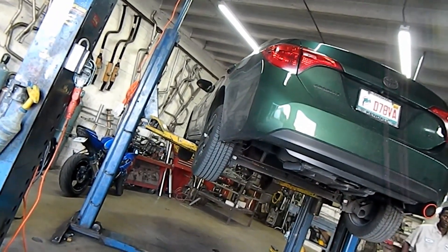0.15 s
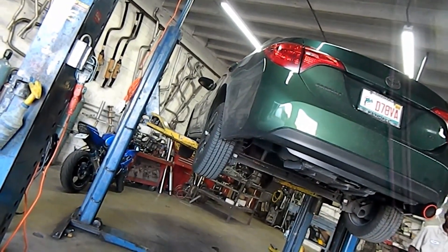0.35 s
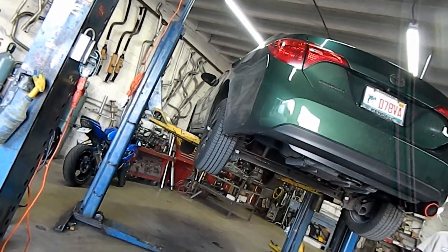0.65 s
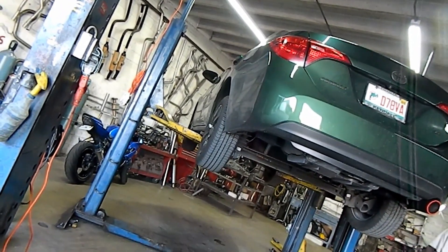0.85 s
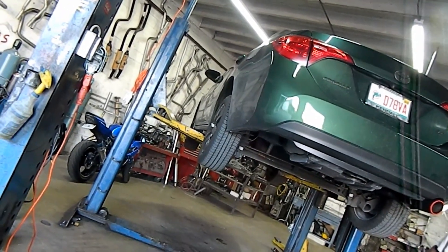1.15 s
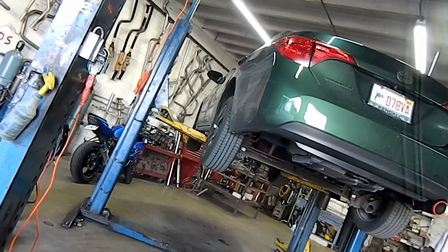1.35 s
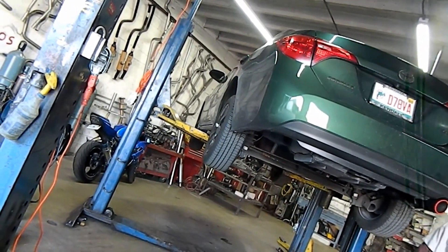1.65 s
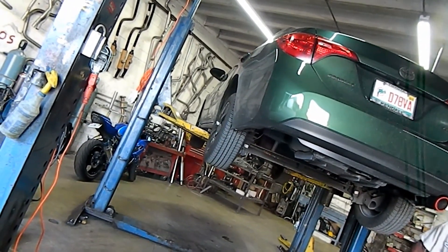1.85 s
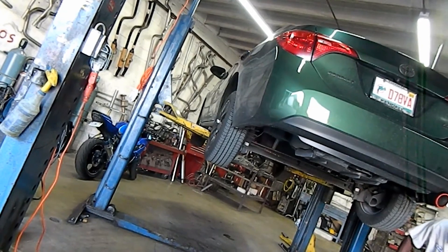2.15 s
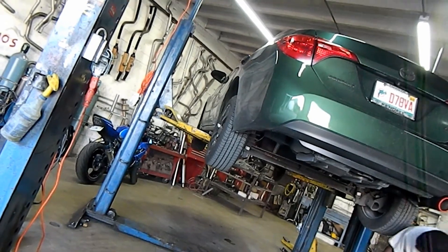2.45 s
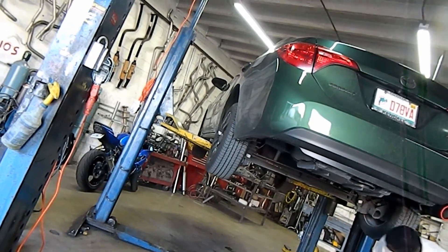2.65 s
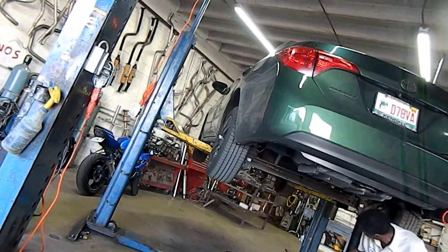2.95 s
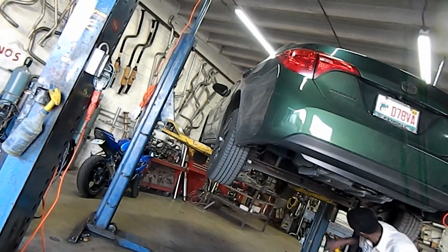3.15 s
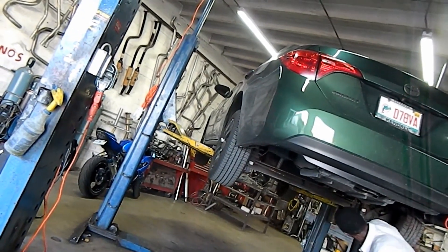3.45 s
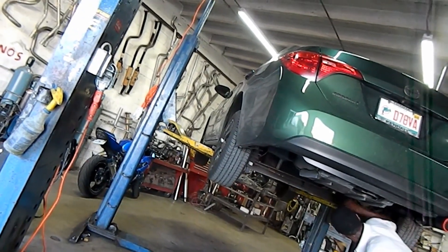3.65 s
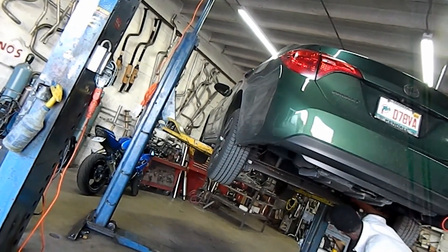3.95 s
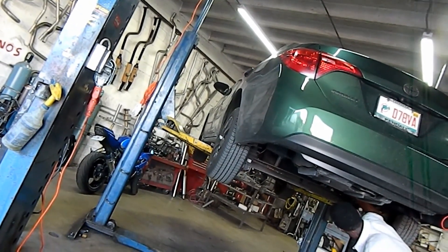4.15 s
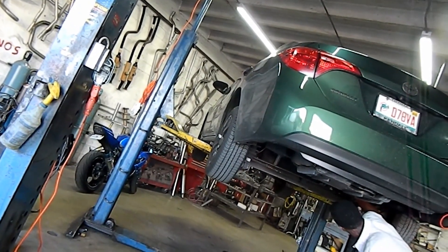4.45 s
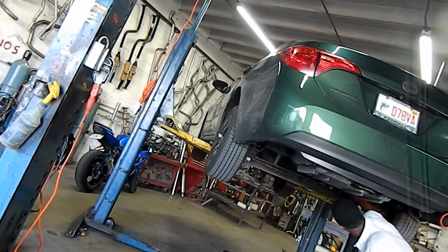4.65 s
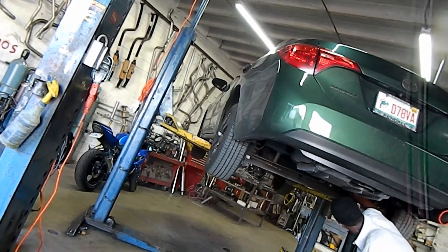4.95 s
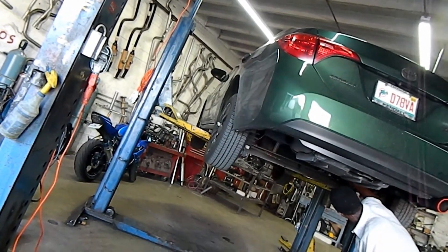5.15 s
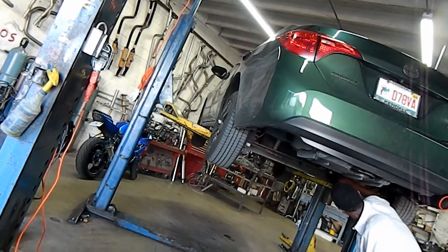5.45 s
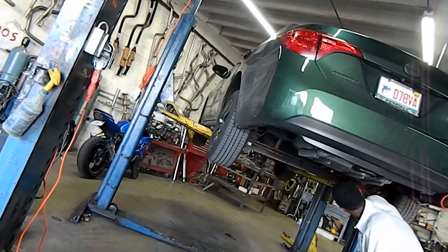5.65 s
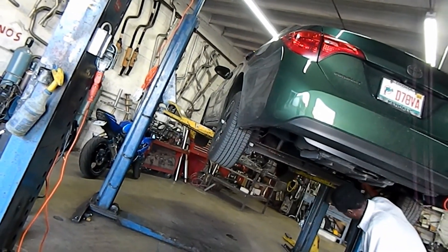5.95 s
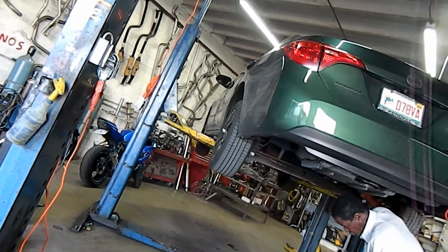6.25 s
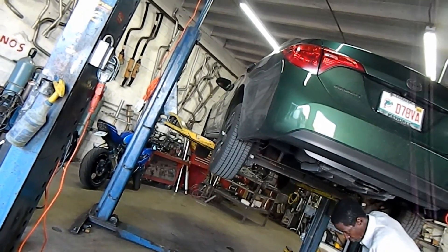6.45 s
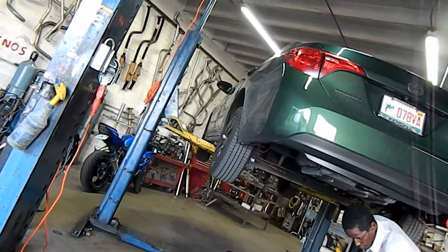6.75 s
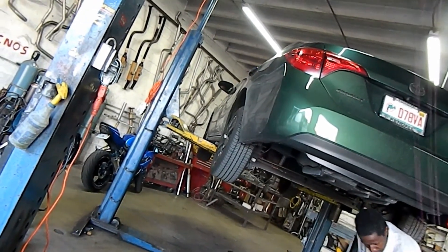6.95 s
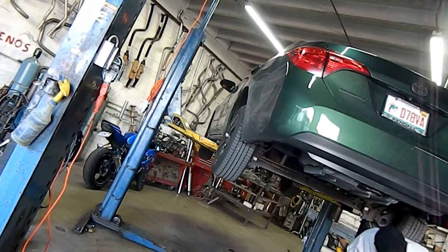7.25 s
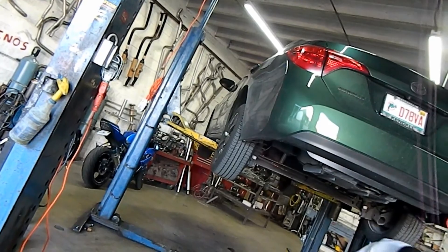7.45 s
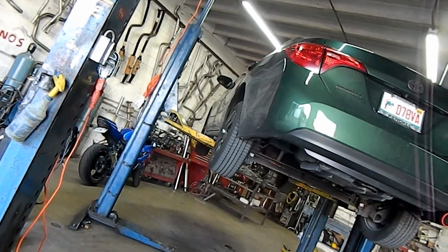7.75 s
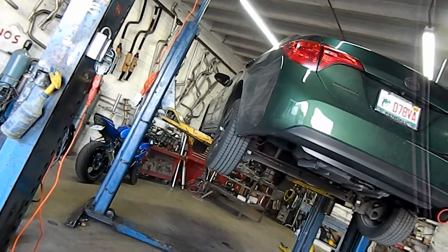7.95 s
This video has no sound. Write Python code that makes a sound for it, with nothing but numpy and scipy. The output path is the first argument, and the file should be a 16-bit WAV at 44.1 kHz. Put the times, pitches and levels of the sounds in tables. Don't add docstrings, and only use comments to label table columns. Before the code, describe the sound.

A loud, unmuffled engine throbs unevenly at idle, slowing slightly and then recovering, its pipe resonances filling a hard garage. Bright bursts of leaking compressed air come and go, with a low electrical hum swelling early and a brief rising whistle. After about seven seconds the engine revs up quickly with sharp cracks, chirping leaks and rattling metal, then pops and starts falling. Close-spaced stereo microphones capture the scene.

```python
import sys
import numpy as np
from scipy import signal
from scipy.fft import rfft, irfft, next_fast_len
from scipy.io import wavfile
from scipy.ndimage import uniform_filter1d

SR = 44100
rng = np.random.default_rng(int(sys.argv[2]) if len(sys.argv) > 2 else 0)


def magnitude_from_level(level_db):
    exponent = np.asarray(level_db, float) / 20
    return 10 ** exponent


def to_wav(s):
    ch = np.atleast_2d(s).T
    pcm = np.round(np.clip(ch, -1, 1) * 32767)
    wavfile.write(sys.argv[1], SR, pcm.astype(np.int16))


N = 357246
TIME = np.arange(N) / SR


def evened(x):
    return x / np.sqrt(np.mean(x ** 2) + 1e-20)


def read(points, hz):
    f, value = np.transpose(points)
    return np.interp(np.log(hz + 1), np.log(f + 1), value)


def curves(rows):
    s, *columns = np.transpose(rows)
    return [np.interp(TIME, s, column) for column in columns]


# frequency in Hz, lead of the left port in radians.
PORT_LEAD = [(60, 0.01), (300, -0.15), (1000, -0.54), (2760, -0.77), (4220, -1), (6550, -5), (12100, -5.5),
             (14100, -6)]
# frequency in Hz, left minus right in dB.
PORT_LEAN = [(60, -2.5), (110, 0), (200, -1.5), (370, 0.5), (680, -0.5), (1240, -0.5), (2270, -3),
             (4160, -7.5), (7610, -7), (14000, 4.5)]


def ports(hz):
    tilt = magnitude_from_level(read(PORT_LEAN, hz) / 2) * np.exp(.5j * read(PORT_LEAD, hz))
    return np.array([tilt, 1 / tilt])


# frequency in Hz, left-right likeness from -1 to 1.
COHERENCE = [(60, 0.91), (130, 0.97), (280, 0.96), (620, 0.94), (1350, 0.91), (2940, 0.51), (6400, 0.12),
             (14000, 0.2)]


def air(colour, patchy_db):
    frames, hz = N // 256 + 5, np.fft.rfftfreq(1024, 1 / SR)
    a, b, c, d, patches = rng.standard_normal((frames, 513, 5), dtype=np.float32).T
    patches = uniform_filter1d(patches, size=12, axis=0)
    patches = evened(uniform_filter1d(patches, size=10, axis=1))
    same = np.clip(read(COHERENCE, hz), -1, 1)[:, None]
    left = a + 1j * b
    right = same * left + np.sqrt(1 - same ** 2) * (c + 1j * d)
    level = magnitude_from_level(read(colour, hz)[:, None] + patchy_db * patches)
    spectrum = np.array([left, right]) * ports(hz)[:, :, None] * level
    x = signal.istft(spectrum, nperseg=1024, noverlap=768)[1][:, :N]
    return x / np.sqrt(np.mean(x.mean(0) ** 2))


def ringing(drive, modes, even=1):
    size = next_fast_len(N + SR)
    f = np.fft.rfftfreq(size, 1 / SR)
    response = 0
    for k, (hz, width, db) in enumerate(modes):
        response = response + (-1) ** k * magnitude_from_level(db) / (1 + 2j * (f - hz) / width) ** 2
    rung = evened(irfft(rfft(drive, size) * response * ports(f), size)[:, :N])
    power = uniform_filter1d(rung.mean(0) ** 2, size=9000)
    return rung / (power + 1e-9) ** (even / 2)


# frequency in Hz, level in dB.
SHOP_COLOUR = [(20, -40), (45, -54), (60, 8), (110, 6), (250, -4.5), (400, -12.5), (600, -14), (800, -58)]


def shop_roar():
    return magnitude_from_level(-23) * air(SHOP_COLOUR, 0.31)


# time in seconds, level in dB.
HUM_LEVEL = [
    (0, -33.5),
    (.75, -22.5),
    (1.05, -50),
    (1.3, -47),
    (2.2, -38),
    (2.5, -21),
    (3.5, -22.5),
    (4.5, -32),
    (8.1, -33),
]


def hum():
    tone_hz = 119.6
    return np.sqrt(2) * magnitude_from_level(curves(HUM_LEVEL)[0]) * np.sin(2 * np.pi * tone_hz * TIME)


# time in seconds, firings in Hz, unevenness of the firings from 0 to 1.
IDLE_SPEED = [(0, 23.3, .4), (.5, 24.2, .36), (1.2, 24.3, .3), (1.55, 24.5, .17), (2, 24.9, .17),
              (2.4, 24.5, .17), (2.6, 23, .4), (2.8, 21, .38), (3.05, 19.7, .35), (3.5, 20, .23),
              (4.1, 19.1, .2), (4.4, 19.7, .2), (4.75, 20.9, .19), (5.05, 22.1, .19), (5.4, 22.4, .18),
              (6.05, 21.7, .18), (6.5, 21, .17), (6.85, 20.9, .17)]
# time in seconds, firings in Hz, unevenness of the firings from 0 to 1.
BLIP_SPEED = [
    (6.93, 23.5, .27),
    (7.05, 27, .38),
    (7.25, 40, .5),
    (7.46, 64, .65),
    (7.62, 86, .62),
    (7.7, 94, .55),
    (7.8, 95.5, .45),
    (7.94, 87.5, .27),
    (8.1, 83.5, .2),
]


def engine_speed():
    return curves(IDLE_SPEED + BLIP_SPEED)


def revs():
    idle_hz = 22
    return np.log2(engine_speed()[0] / idle_hz)


# start in seconds, open length in seconds, level in dB,
# loss after it shuts in dB per second.
VALVE = [
    (0, 1.4, -40, 12),
    (1.762, 0.88, -42, 40),
    (3.653, 1.645, -38.5, 41),
    (5.77, 1.186, -40, 93),
]
# peak time in seconds, level in dB, rise in seconds, fall in seconds,
# extra brightness in dB.
SPURTS = [(.43, -37, 0.062, 0.15, 1), (1.01, -38.5, .015, 0.14, -5), (1.4, -44, .06, 0.056, -1),
          (1.79, -47, .012, .04, 4.5), (2.0, -42, 0.077, 0.19, 1), (2.4, -39.5, 0.18, 0.22, -1),
          (3.11, -44, 0.037, 0.084, -6), (3.45, -44, 0.19, 0.2, -4.5), (3.68, -45, 0.024, 0.022, 4),
          (3.98, -38, 0.1, 0.39, -0.5), (4.54, -38, 0.086, 0.079, 0.5), (5.17, -38, 0.063, .06, 1),
          (5.8, -40.5, 0.036, 0.046, 5.5), (6.16, -40, 0.094, 0.12, 0.5), (6.8, -46, 0.14, .1, 0.5),
          (7.82, -50, 0.11, 0.14, 3)]


def air_flow():
    open_s = .012
    t = np.arange(0, N / SR + .01, .002)
    seep_db = -47.5 - 5 * np.interp(t, TIME, np.maximum(revs(), 0))
    power = magnitude_from_level(2 * seep_db)
    for s, length, db, loss_db in VALVE:
        opened = np.clip((t - s) / open_s + (s == 0), 0, 1)
        bled_db = loss_db * np.maximum(t - s - length, 0)
        power = power + opened ** 2 * magnitude_from_level(2 * (db - bled_db))
    bright_db = 0
    for s, db, rise, fall, tint_db in SPURTS:
        shape = np.exp(-((t - s) / np.where(t < s, rise, fall)) ** 2)
        power = power + magnitude_from_level(2 * db) * shape
        bright_db = bright_db + tint_db * shape
    return [np.interp(TIME, t, value) for value in (10 * np.log10(power), bright_db)]


# frequency in Hz, level in dB per Hz.
JET_BODY = [(1880, -4.5), (3200, -7.5), (4430, -5), (6600, -7), (8800, -16), (11400, -35), (19400, -120)]
# frequency in Hz, level in dB per Hz.
JET_TREBLE = [(4800, -26), (8200, -5), (10000, -3.5), (11900, -2.5), (13000, -9), (13800, -18),
              (14500, -30), (16000, -80)]


def hiss(flow_db, bright_db):
    excess = flow_db + 40
    sputter = magnitude_from_level(.6 * evened(uniform_filter1d(rng.standard_normal(N), size=150)))
    top = air(JET_TREBLE, 1.7)
    dull = signal.sosfiltfilt(signal.butter(4, 11000, fs=SR, output="sos"), top)
    sparkle = np.clip(1 + (excess + bright_db + 2) / 9, .1, 1)
    top = dull + sparkle * (top - dull)
    jet = air(JET_BODY, 0.98) + magnitude_from_level(-10 + 0.53 * excess + bright_db) * top
    return magnitude_from_level(flow_db) * evened(sputter) * jet


# time in seconds, level in dB.
GAS = [(0, -26), (1.3, -24.5), (2.5, -24.5), (2.9, -26.5), (3.4, -25.5), (3.8, -26.5), (4.3, -25.5),
       (5.2, -26), (5.6, -27), (6.9, -26.5), (7.12, -32.5), (7.35, -27.5), (7.51, -18.5), (7.85, -24.5),
       (8.1, -27.5)]


def gas_flow():
    return curves(GAS)[0]


# frequency in Hz, level in dB per Hz.
RUSH_COLOUR = [(820, -10.5), (1400, -8), (1890, -3), (2160, -5.5), (3600, -15), (4680, -33.5), (7920, -120)]


def rush(flow_db):
    dragged = magnitude_from_level(-31 - 4.5 + 0.73 * (flow_db + 40))
    exhaust = magnitude_from_level(gas_flow() - 19)
    return np.hypot(dragged, exhaust) * air(RUSH_COLOUR, 0.87)


# start in seconds, length in seconds, first and last frequency in Hz,
# level in dB.
LEAKS = [
    (3.28, 0.29, 1091, 1234, -29.5),
    (6.88, .11, 2140, 2380, -37),
    (6.997, 0.091, 2520, 2510, -41.5),
    (7.407, 0.049, 2480, 2430, -38),
    (7.48, .15, 2470, 2540, -40.5),
]


def leaks():
    out = np.zeros((2, N))
    r = np.exp(-np.pi * 250 / SR)
    for start, length, first_hz, last_hz, db in LEAKS:
        u = np.arange(0, 1, 1 / (length * SR))
        glide_hz = first_hz + (last_hz - first_hz) * u
        turn = np.exp(2j * np.pi * np.cumsum(glide_hz) / SR)
        a, b = rng.standard_normal((2, len(u)))
        slow = signal.lfilter([1], np.convolve([1, -r], [1, -r]), a + 1j * b)
        whistle = evened((turn * slow).real) * magnitude_from_level(db) * np.sin(np.pi * u)
        out[:, round(start * SR):][:, :len(u)] += whistle * magnitude_from_level([[-1.2], [1.2]])
    return out


# time in seconds, peak in dB.
CRACKS = [(6.952, -8), (7.031, -14), (7.068, -14), (7.2764, -7), (7.3002, -7), (7.343, -13), (7.362, -8),
          (7.382, -9), (7.464, -10), (7.502, -12), (7.897, -7), (7.967, -12)]


def cracks():
    front_s, spike_s, hump_s = .00012, .0003, .0011
    t, out = np.arange(600) / SR, np.zeros((2, N))
    spike = (1 - np.exp(-t / front_s)) * np.exp(-t / spike_s)
    hump = np.sin(np.pi * t / (2 * hump_s)) * np.exp(-t / hump_s)
    front = signal.sosfilt(signal.butter(2, 2200, fs=SR, output="sos"), 2 * spike + hump)
    for s, db in CRACKS:
        ring = signal.lfilter([.06], [1, -1.75, .82], rng.standard_normal((2, 600))) * np.exp(-t / .002)
        tick = magnitude_from_level(-35) * rng.standard_normal((2, 600)) * np.exp(-t / .0004)
        crack = magnitude_from_level(db) * (front + magnitude_from_level(-14) * ring + tick)
        out[:, round(s * SR):][:, :600] += crack * magnitude_from_level([[-1], [1]])
    return out


# frequency in Hz, level in dB, 60 dB decay time in seconds.
POP_MODES = [(180, -6, .14), (282, 0, .13), (345, -1.5, .11), (395, -7, .09)]


def backfire():
    t = np.clip(TIME - 7.874, 0, None)
    pop = sum(magnitude_from_level(db - 60 * t / t60) * np.sin(2 * np.pi * hz * t) for hz, db, t60 in POP_MODES)
    return magnitude_from_level(-5) * pop * (1 - np.exp(-t / 0.0033))


def crank():
    tremble = evened(uniform_filter1d(rng.standard_normal(N), size=4000))
    return np.cumsum(engine_speed()[0] * (1 + .004 * tremble)) / SR


def firings(turns):
    hz, uneven = engine_speed()
    at = np.flatnonzero(np.diff(np.floor(turns)))
    puffs, flow = np.zeros(N), rng.standard_normal(N)
    strength = magnitude_from_level(5 * uneven[at] * rng.standard_normal(len(at)))
    puffs[at] = strength * np.sqrt(SR / hz[at])
    harsh = np.minimum(uneven + 8 / hz, 1)
    return [np.sqrt(1 - share ** 2) * puffs + share * flow for share in (uneven, harsh)]


# frequency in Hz, level in dB per Hz.
RASP_COLOUR = [(280, -42), (480, -4), (625, -2.5), (673, 1.5), (970, 2), (1440, -4), (1700, -5.5),
               (2210, -26), (3740, -120)]
# frequency in Hz, width in Hz, level in dB.
HEAT_SHIELD = [(663, 16, 0), (743, 24, -4), (812, 18, 0), (880, 18, 0), (985, 28, -3), (1090, 28, -5),
               (1210, 32, -9), (1290, 32, -9)]


def rasp(turns, harsh):
    beat = evened(1 + .15 * np.exp(-(turns % 1) / .2))
    gas = beat * magnitude_from_level(-1.5 * revs()) * air(RASP_COLOUR, 1.5)
    rattle = magnitude_from_level(-7 + 3 * revs()) * ringing(harsh, HEAT_SHIELD)
    return magnitude_from_level(gas_flow() - 4.5) * (gas + rattle)


# frequency in Hz, width in Hz, level in dB.
DEEP_PIPE = [
    (71.1, 16, -1.5),
    (80, 19, -5.5),
    (106.7, 21, -1.5),
]
# frequency in Hz, width in Hz, level in dB.
MAIN_PIPE = [(117.6, 36, -16), (134.8, 6.1, 1), (150.1, 13.5, 1.5), (174.2, 10.5, 2), (209.67, 7.44, 8.5),
             (225.8, 15.5, -9.5), (239.1, 10, -16)]
# frequency in Hz, width in Hz, level in dB.
UPPER_PIPE = [(262.3, 27, -16.5), (285.4, 7.6, -1.7), (312.8, 12, -15)]
# frequency in Hz, width in Hz, level in dB.
TAIL_PIPE = [(338, 11.7, 6), (365, 27, -8), (397.8, 16, 0.5), (430.5, 27, -15), (455.4, 11, 4.2),
             (502, 33, -5.5), (536, 8.5, -7.5), (581, 34, -10.5)]
# time in seconds, level in dB.
LOAD = [(0, -20), (.6, -18.5), (1.1, -20.5), (1.4, -16), (2.33, -14), (2.5, -21), (3.05, -22.5),
        (3.65, -18.5), (3.9, -15), (4.5, -16.5), (4.8, -12.5), (5.3, -14.5), (6.8, -13.5), (7.0, -15.5),
        (7.45, -16.5), (7.75, -22), (7.95, -15), (8.1, -22.5)]
# time in seconds, half length in seconds, change of the
# deep, upper and tail sections in dB.
LURCHES = [(.25, 0.11, 6, -5.5, 0), (2.3, .06, -15, 3, -1.5), (2.9, 0.11, 14, -8, 4),
           (4.2, 0.15, 7, -8, -0.5), (4.6, 0.13, 12, 2, 2.5), (5.0, 0.059, 1, 4, -9),
           (5.6, 0.18, 0, 3.5, -2.5), (6.928, 0.063, 10.5, 3.5, 0), (7.058, 0.054, 14.5, 5, 1),
           (7.232, 0.033, 11, 8.5, -7), (7.42, 0.037, 3.5, 3, 3.5), (7.48, .025, -12, 3.5, 3),
           (7.55, .03, -1, -6, 0.5), (7.72, 0.035, 0, 5, -5), (7.84, 0.031, -2, -7.5, 0.5),
           (7.9, 0.045, 7.5, 0, -1.5)]


def boom(soft, harsh):
    load_ref_db = -16
    load, up = curves(LOAD)[0] - load_ref_db, np.maximum(revs(), 0)
    lurch_db = 0
    for s, half, *dbs in LURCHES:
        lurch_db = lurch_db + np.outer(dbs, np.exp(-((TIME - s) / half) ** 2))
    deep_db, upper_db, tail_db = lurch_db

    def section(drive, modes, db, follow, rev_db, even, change_db):
        level_db = load_ref_db + db + follow * load + rev_db * up + change_db
        return magnitude_from_level(level_db) * ringing(drive, modes, even)

    deep = section(soft, DEEP_PIPE, -12.5, 0.97, 2, 1, deep_db)
    main = section(soft, MAIN_PIPE, 0, 1.21, 0.087, 0.75, 0)
    upper = section(harsh, UPPER_PIPE, -14.5, 0.83, 6.5, 0, upper_db)
    tail = section(harsh, TAIL_PIPE, -19, 0.3, 9, 0, tail_db)
    return deep + main + upper + tail


def scene():
    flow_db, bright_db = air_flow()
    turns = crank()
    soft, harsh = firings(turns)
    shop = shop_roar() + hum()
    gas = hiss(flow_db, bright_db) + rush(flow_db) + leaks()
    return shop + gas + cracks() + backfire() + rasp(turns, harsh) + boom(soft, harsh)


def band_limit(x):
    return signal.sosfilt(signal.butter(12, 14550, fs=SR, output="sos"), x)


# frequency in Hz, lowest level kept in dB.
FAINTEST = [(5000, -120), (7500, -99), (9500, -91), (12000, -84.5), (14500, -83)]


def record(dry):
    high = signal.sosfilt(signal.butter(4, 55, "high", fs=SR, output="sos"), dry)
    thin = high + .3 * dry
    limited = thin / (1 + abs(thin) ** 10) ** (1 / 10)
    padded = np.pad(limited, ((0, 0), (0, 2048)), "reflect")
    hz, _, z = signal.stft(padded, SR, nperseg=1024, boundary="even")
    audible = abs(z) > magnitude_from_level(read(FAINTEST, hz))[:, None]
    mix = signal.istft(z * audible, SR, nperseg=1024)[1][:, :N]
    return band_limit(mix)


dry = scene()
out = record(dry)
to_wav(out)
```